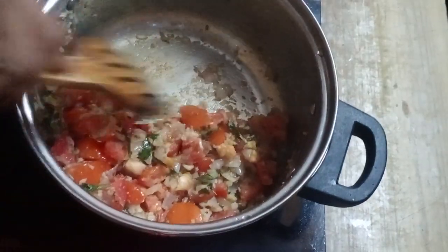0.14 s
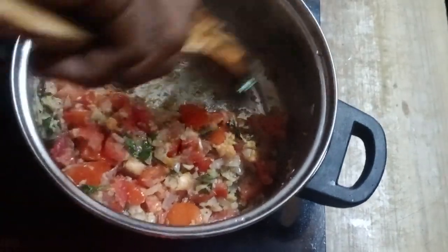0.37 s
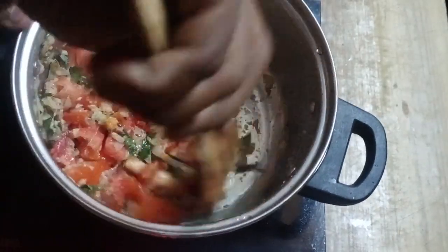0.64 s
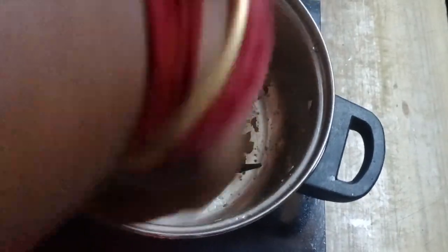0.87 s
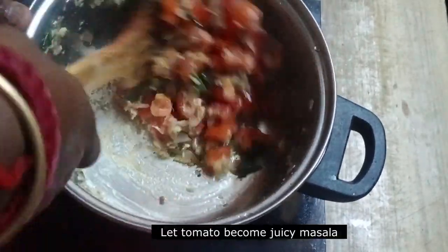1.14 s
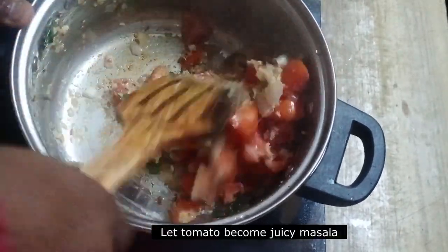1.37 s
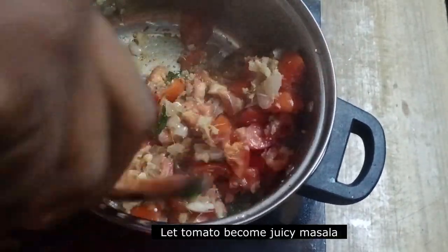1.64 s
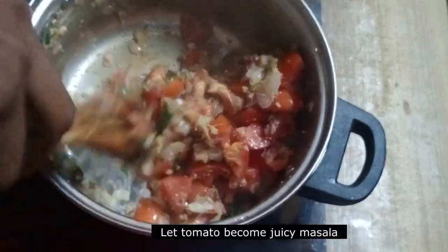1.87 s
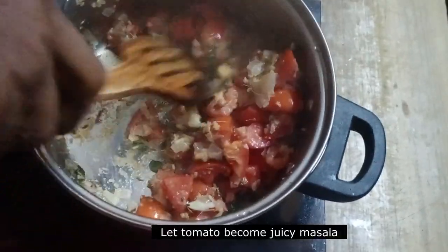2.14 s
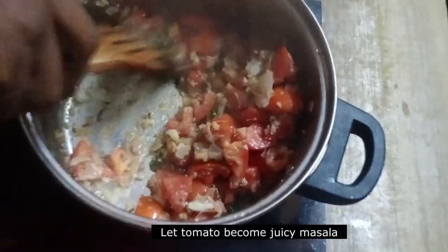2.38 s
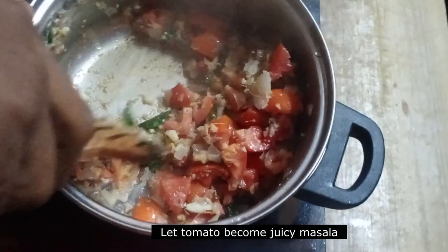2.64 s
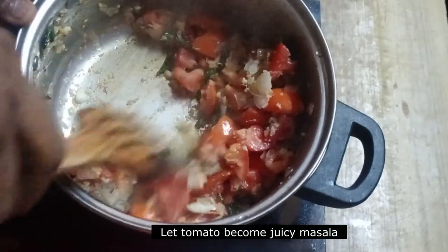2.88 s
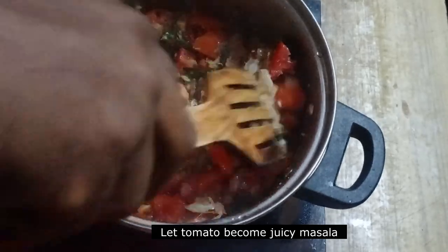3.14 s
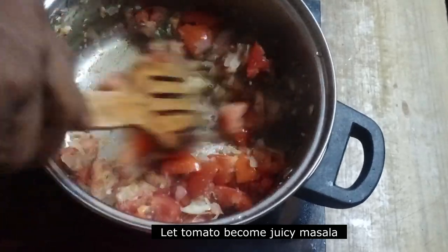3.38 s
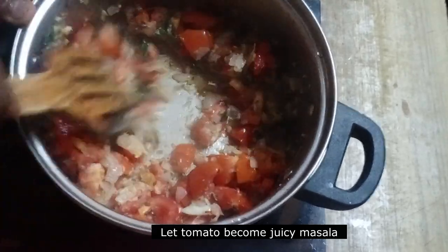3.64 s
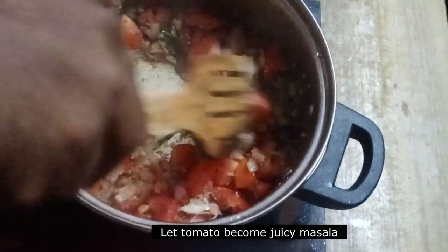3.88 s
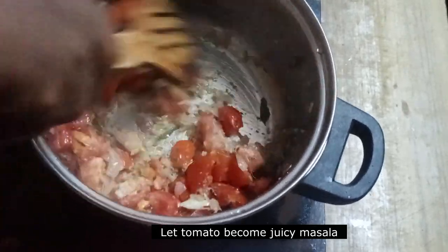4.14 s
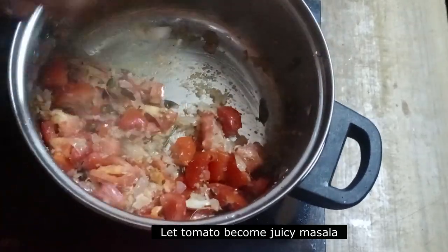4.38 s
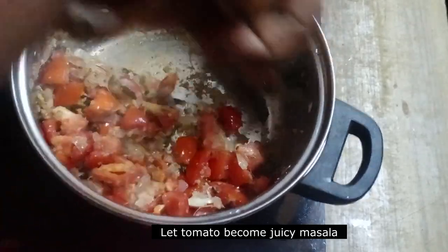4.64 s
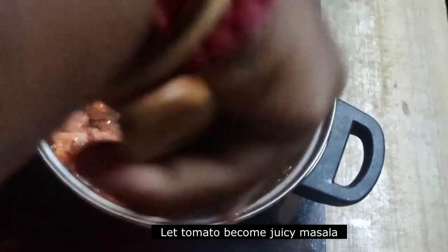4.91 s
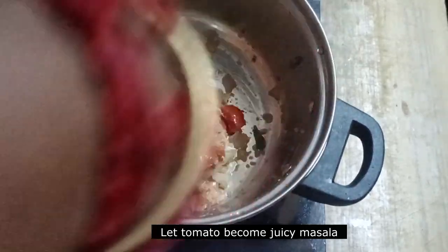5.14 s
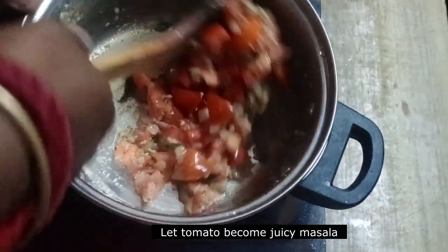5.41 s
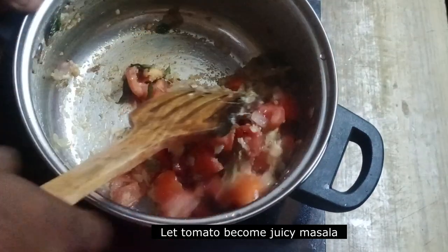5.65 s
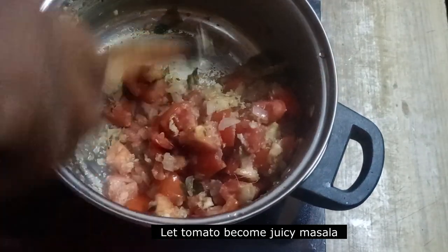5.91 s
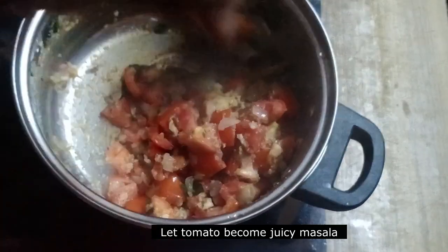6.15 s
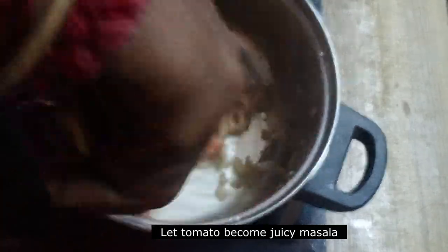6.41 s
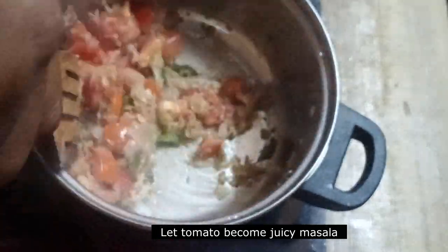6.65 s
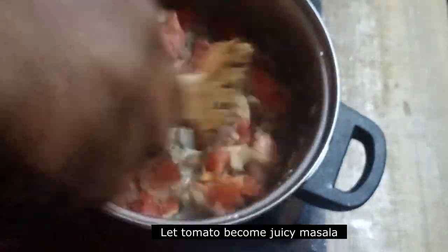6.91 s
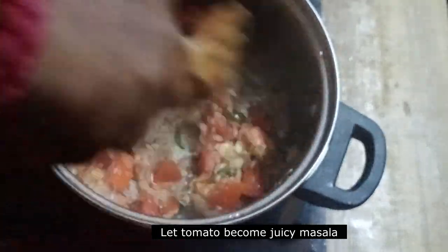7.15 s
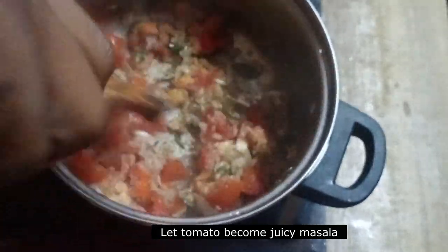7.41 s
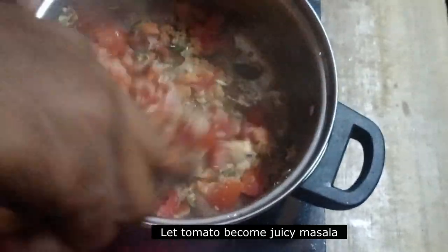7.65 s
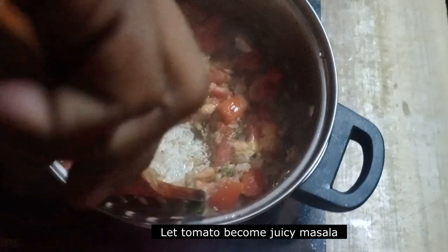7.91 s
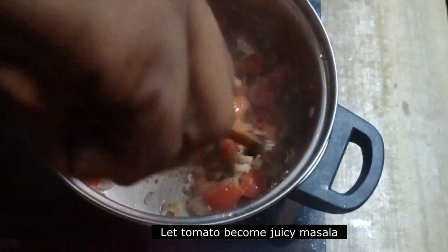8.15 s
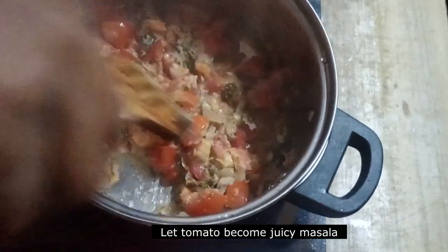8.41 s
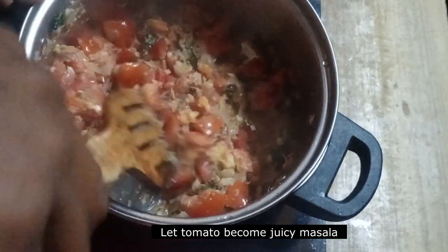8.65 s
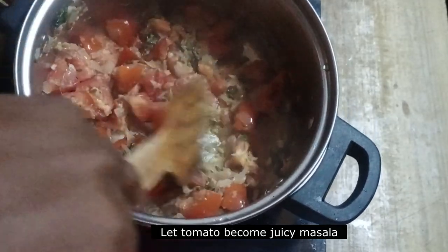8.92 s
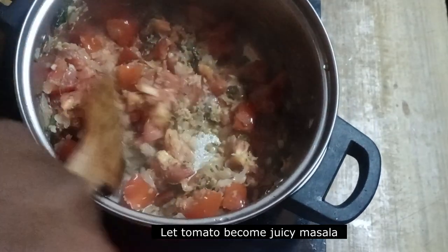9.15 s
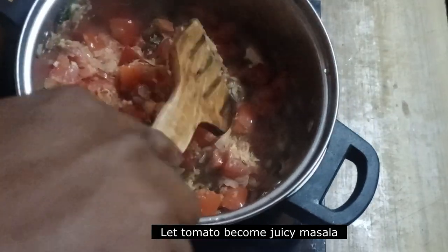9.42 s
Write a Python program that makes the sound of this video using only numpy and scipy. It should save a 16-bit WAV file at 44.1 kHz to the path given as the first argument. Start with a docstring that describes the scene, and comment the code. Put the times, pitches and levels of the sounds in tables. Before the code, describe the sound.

Close, bright frying hiss with dense crackle and sharp spits, flaring as wet vegetables are stirred, with woody scrapes and dull pot knocks.

```python
"""From the start, chopped tomato and onion sizzle in oil in a steel pot, close under a mono phone microphone:
dense clicks over a coloured hiss, with rare sharp spits. A wooden spatula strokes the pot, with a rumble
and hum through the stove and a scrape; its knocks make the pot ring dully. The oil flares up as wet food
meets bare hot steel, and now and then the sound thins to a few tones. Between 6.6 and 7.4 s the spatula
judders too, its slips thumping the stove grate and the pot."""
import sys
import numpy as np
from scipy import signal
from scipy.fft import rfft, irfft
from scipy.io import wavfile
from scipy.ndimage import uniform_filter1d

SR = 44100
rng = np.random.default_rng(int(sys.argv[2]) if len(sys.argv) > 2 else 0)


def master_out(mix):
    """Clip the mix to full scale and print it as 16-bit PCM to the path in sys.argv[1]."""
    frames = np.transpose(np.atleast_2d(mix))
    ceiling = np.clip(frames, -1, 1)
    pcm = np.round(ceiling * 32767).astype(np.int16)
    wavfile.write(sys.argv[1], SR, pcm)


def invert_db(level):
    """Linear amplitude ratio for a level in decibels (20 dB per decade), elementwise."""
    return 10 ** (np.asarray(level, dtype=float) / 20)


N = 420713

# How hard the oil fries. Each row: time in seconds, hiss level in dB, low fizz near 1.5 kHz in dB
# (for the fizz, only the changes against the hiss count).
FRYING = [(0.0, -25.5, -40.5), (0.58, -31, -48), (0.77, -27, -41.5), (0.9, -24, -42.5), (1.01, -23.5, -38),
          (1.33, -24, -45), (1.97, -24, -43), (2.23, -23.5, -39.5), (2.66, -23.5, -43.5),
          (3.27, -26.5, -45.5), (3.56, -22.5, -36), (3.93, -24, -39), (4.33, -24.5, -38),
          (4.49, -26, -43.5), (4.81, -25.5, -46), (5.26, -22, -35.5), (5.5, -22.5, -42), (6.24, -26, -47.5),
          (6.69, -22, -33.5), (6.91, -20.5, -34), (7.52, -22, -37), (8.03, -22, -40.5), (8.15, -22, -38.5),
          (9.54, -26, -45.5)]
# Colour of the sizzle. Each row: frequency in Hz, relative strength in dB per Hz.
SIZZLE_COLOUR = [(530, -32), (950, -28.5), (1080, -35), (1150, -15.5), (1290, -9.5), (1660, -12.5),
                 (2150, -12.5), (2700, -4.5), (3690, -0.5), (5090, -2), (6460, 1), (7200, -4.5),
                 (9360, -20.5), (11300, -17.5), (14700, -1), (15600, -6.5)]
# Finest spatter above the hiss. Each row: time in seconds, lift of the top treble in dB.
TOP_FIZZ = [(0, -1.5), (.9, 0.5), (1.8, -2), (3.0, 0), (3.6, 0.5), (4.6, 0), (5.6, -1.5), (7.0, -2.5),
            (7.8, -1.5), (9.54, -4)]
# Wet food meets hot steel and the sizzle flares. Each row: start in seconds, lift in dB before it fades.
FLARES = [(.3, 1.5), (.76, 1.5), (1.36, 1.5), (1.98, 1.5), (2.18, 2.5), (2.86, 2), (3.33, 6), (3.7, 3.5),
          (4.12, 5.5), (4.41, 3), (5.25, 1.5), (6.35, 5), (6.46, 1.5), (6.79, 1.5), (7.24, 3.5),
          (7.61, 2.5), (8.6, 1), (8.91, 2), (9.19, 3)]
FLARE_RISE_S, FLARE_FALL_S = 0.019, 0.12
FLARE_LOW = 1.1  # the low fizz swings this many times as far
SPITS_PER_S, SPIT_DB = 14, -19  # rare large drops of water bursting in the oil; typical size

# Colour of the stove's rumble. Each row: frequency as a multiple of the centre, strength in dB per Hz.
RUMBLE_COLOUR = [(.15, -60), (.4, -8.5), (.7, -16.5), (1.0, 2), (1.35, -9.5), (2.2, -23.5), (4, -65)]
# Ringing modes of the pot with food in it. Each row: frequency in Hz, relative level in dB,
# time to fall 60 dB in seconds.
POT_MODES = [(150, -32, 0.11), (205, -18, 0.24), (283.6, -5, 0.078), (361, 0.5, 0.032), (420, -5, 0.1),
             (438.2, -5, 0.13), (485, -5.5, 0.051), (560, -11, 0.14), (600, -4.5, 0.02), (697, -14.5, 0.14),
             (765.6, -10.5, 0.16), (834, -8.5, 0.094), (951, -10, 0.072), (1040, -4, 0.036),
             (1180, -15, 0.15), (1299, -2, 0.064), (1450, -14, 0.2), (1544, 3.5, 0.009),
             (1930, -7.5, 0.037), (2496, -2.5, 0.032), (2918, 5.5, 0.033), (3620, -1, 0.036),
             (5460, 9, 0.07), (7430, -15, 0.057)]
# Strokes of the spatula. Each row: start in seconds, length in seconds, mid-stroke rumble through the
# stove in dB, its mid-stroke centre in Hz, scrape of wood on steel in dB.
STROKES = [(0.013, 0.11, -51, 192, -70), (0.303, 0.21, -58.5, 151, -52), (0.535, 0.14, -55, 70, -49),
           (0.877, .16, -45, 195.8, -43), (1.047, 0.13, -55, 75, -53), (1.25, 0.11, -51, 97, -62),
           (1.645, .15, -46.5, 103.3, -65), (1.815, 0.11, -55, 153, -44), (2.043, 0.34, -47, 105.2, -57),
           (2.363, 0.18, -41, 114.8, -41), (2.578, 0.11, -57, 195, -47), (2.8, 0.32, -50, 107.4, -55),
           (3.13, 0.19, -46, 103.2, -65), (3.375, 0.094, -48, 122, -54), (3.554, 0.24, -48.5, 101.7, -80),
           (3.89, 0.14, -48, 106, -60), (4.0, 0.21, -45.5, 144.7, -47), (4.27, 0.13, -47, 190, -50),
           (4.639, 0.21, -48, 105, -56), (4.75, 0.274, -54.5, 188.3, -64), (4.9, 0.085, -57, 95, -60),
           (5.172, .16, -51, 95.7, -66), (5.391, 0.1, -45, 106, -50), (5.547, 0.23, -55, 105, -57),
           (5.553, .6, -58, 66.5, -56), (5.99, .11, -43, 196, -58), (6.127, 0.4, -44.5, 102, -52),
           (6.7, 0.37, -48, 99.4, -50), (7.08, 0.4, -46, 67.2, -54), (7.45, 0.264, -37, 116, -56),
           (7.64, 0.13, -41.5, 194.4, -55), (7.824, 0.29, -41.5, 100.1, -55),
           (8.094, 0.52, -45, 113.9, -63), (8.637, 0.11, -51, 101, -63), (9.133, 0.39, -49.5, 94.5, -63),
           (9.25, 0.11, -37.5, 199, -47)]
STROKE_EDGE_S = 0.045  # soft start and end
STROKE_RISE = 0.067  # the rumble climbs by this share as the blade speeds up
STROKE_SWELL_DB = 2  # growth in level from start to end
REST_RUMBLE_DB, REST_HZ, REST_SCRAPE_DB = -71.5, 80, -59  # always there, also between strokes
HUM_DB, HUM_WAVER = -0.5, 0.028  # offset from the rumble level in dB, pitch waver as a share (rms)

# Spatula blows. Each row: start in seconds, peak level in dB, frequency favoured by the spot struck in Hz,
# how much it is favoured in dB, hardness as a lift of the higher modes in dB (scaled inside knock).
KNOCKS = [(0.041, -21, 374, 17, 2), (0.338, -8, 487, 14.5, 3), (0.388, -23.5, 450, 17, 3),
          (0.421, -18, 1920, 16, 6), (0.879, -31, 479, 22, 0), (1.712, -31, 420, 15, 3.5),
          (1.823, -20, 710, 20, -6), (1.982, -32, 305, 12, -2), (2.386, -10, 990, 3.5, 2),
          (2.579, -18.5, 1440, 7, -4.5), (3.649, -22.5, 640, 39, 5), (3.745, -28, 1390, -3, 1),
          (3.994, -22, 402, 24, 1), (4.089, -20, 425, 11, 5.5), (4.274, -11.5, 560, 5, -2),
          (4.299, -17.5, 1180, 10, -0.5), (4.424, -13, 1280, 10, 7.5), (4.451, -18, 459, 7.5, 4.5),
          (4.687, -13, 1040, 11.5, -4.5), (4.742, -20.5, 414, 1, 1.5), (5.418, -37, 342, 20, -5),
          (6.007, -12.5, 1450, 14.5, 7.5), (6.212, -14.5, 1040, 19, -6), (6.262, -19, 427, 3, -1.5),
          (6.386, -28, 483, 3, -3), (6.64, -23, 425, 5, -6), (6.698, -31, 436, 16, -2),
          (6.791, -17, 627, 24, 3), (6.846, -25, 1280, -9, 2), (7.049, -14.5, 420, 12, 6.5),
          (7.139, -29.5, 287, 18, -7), (7.627, -24.5, 1232, 10, 4.5), (7.698, -26.5, 445, 2, 0),
          (7.913, -17.5, 1930, 24, 6), (7.954, -14.5, 1290, 8, 3.5), (8.019, -14, 1180, 10, 3.5),
          (8.088, -13, 1030, 13, 1), (8.338, -34, 414, 18, -2), (8.649, -21.5, 410, 14, 9.5),
          (8.905, -24, 420, 16, 8.5), (9.174, -19, 425, 19, 10), (9.217, -18.5, 408, 9, 7.5),
          (9.27, -23, 428, 19, 1), (9.307, -33, 410, 27, 8), (9.359, -39, 420, 21, -1)]
CHATTER_DB, CHATTER_SLOPE = -32.5, -0.52  # light blows chatter more for their size: dB per dB of peak
# Moments when the whole sound thins to a few tones. Each entry: middle in seconds.
THIN = [.667, .690, .737, .760, .853, 1.341, 1.387, 1.944, 2.501, 2.524, 5.171, 5.218, 5.288, 5.357, 6.333,
        6.658, 6.681, 7.076, 7.424, 7.470, 7.795, 7.819]
# The spatula judders along the bottom. Each row: time in seconds, slips a second, level in dB.
JUDDER = [(6.62, 35, -48), (6.72, 35, -45.5), (7.0, 35, -41), (7.32, 35.5, -42), (7.42, 32, -67)]
EDGE_HZ = 15760  # upper limit of the band


def evened(x):
    """Scales a signal so its average size (rms) is 1."""
    return x / np.sqrt(np.mean(x ** 2) + 1e-20)


def read(points, hz):
    """Reads a spectrum on a log-frequency axis, as pitch is heard."""
    f, value = np.transpose(points)
    return np.interp(np.log(hz + 1), np.log(f + 1), value)


def curves(rows, t):
    """Reads every column of a table of changes at times t."""
    s, *columns = np.transpose(rows)
    return [np.interp(t, s, c) for c in columns]


def add(mix, s, sound):
    """Mixes a sound in, starting at s seconds."""
    part = mix[round(s * SR):][:len(sound)]
    part += sound[:len(part)]


def spectrum(x, size):
    """Splits a sound into frequencies and overlapping moments."""
    return signal.stft(x, SR, nperseg=size, noverlap=size * 3 // 4)


def sound_from(z, size):
    """Turns such a spectrum back into sound."""
    return signal.istft(z, SR, nperseg=size, noverlap=size * 3 // 4)[1][:N]


def patches(shape, bins, frames):
    """Random blotches over frequency and time, with rms 1."""
    z = rng.standard_normal(shape[::-1]).T
    z = uniform_filter1d(z, bins, 0)
    return evened(uniform_filter1d(z, frames, 1))


def frying(t):
    """Level of the hiss and of the low fizz at times t: a slow curve plus every flare."""
    s, lift_db = np.transpose(FLARES)[:, :, None]
    since = np.maximum(t - s, 0)
    rise = np.minimum(since / FLARE_RISE_S, 1)
    flare_db = (lift_db * rise * np.exp(-since / FLARE_FALL_S)).sum(0)
    level_db, low_db = curves(FRYING, t)
    return level_db + flare_db, low_db + FLARE_LOW * flare_db


def sizzle(pops_per_s=5000, size_db=0.5, hiss=0.73, patchy_db=1.31, blotchy_db=5.0):
    """Steam bubbles burst in the oil: dense uneven clicks over a hiss, coloured by pot and microphone."""
    size = invert_db(size_db * np.minimum(rng.exponential(1, N), 6)) * rng.choice([-1., 1.], N)
    pops = size * (rng.random(N) < pops_per_s / SR)
    hz, t, z = spectrum(evened(pops) + hiss * rng.standard_normal(N), 1024)
    level_db, low_db = frying(t)
    # how far each frequency belongs to the low fizz or to the finest spatter, 0 to 1
    low = np.clip((3000 - hz) / 800, 0, 1)[:, None]
    top = np.clip((hz - 7500) / 1500, 0, 1)[:, None]
    low_db = low_db - level_db
    top_db = curves(TOP_FIZZ, t)[0] - 0.027 * (level_db - level_db.mean())
    shift_db = low * (low_db - low_db.mean()) + top * top_db
    # the low fizz breaks into short, faintly pitched blotches
    blotches_db = low * blotchy_db * patches(z.shape, 2, 8)
    patch_db = patchy_db * patches(z.shape, 16, 6)
    z = z * invert_db(read(SIZZLE_COLOUR, hz)[:, None] + shift_db + blotches_db + patch_db)
    return evened(sound_from(z, 1024)) * invert_db(np.interp(np.arange(N) / SR, t, level_db))


def spits(spread_db=3.0, centre_hz=5000, t60=0.0032):
    """Single sharp spits of oil, each a very short bright tick at a random moment."""
    t = np.arange(SR // 100) / SR
    tick = invert_db(-60 * t / t60) * np.sin(2 * np.pi * centre_hz * t)
    size = invert_db(SPIT_DB + spread_db * rng.standard_normal(N)) * rng.choice([-1., 1.], N)
    hits = size * (rng.random(N) < SPITS_PER_S / SR)
    return signal.oaconvolve(hits, tick)[:N]


def stroke_gates(t):
    """For each stroke: its gate from 0 to 1 with soft edges, and how far through the stroke it is."""
    s, length = np.transpose(STROKES)[:2, :, None]
    gate = np.clip(np.minimum(t - s, s + length - t) / STROKE_EDGE_S, 0, 1)
    return gate, np.clip((t - s) / length, 0, 1)


def rumble(lumpy_db=6.0):
    """Strokes shake the stove: lumpy low noise whose centre climbs during each stroke."""
    rumble_db, centre_hz = np.transpose(STROKES)[2:4, :, None]
    fine = np.arange(0, N + 64, 64) / SR
    gate, along = stroke_gates(fine)
    power = (gate * invert_db(rumble_db + STROKE_SWELL_DB * (along - .5))) ** 2
    rest = invert_db(REST_RUMBLE_DB) ** 2
    total = power.sum(0) + rest
    # louder strokes pull the shared centre harder
    climbing_hz = centre_hz * (1 + STROKE_RISE * (along - .5))
    centre = ((power * climbing_hz).sum(0) + rest * REST_HZ) / total
    hz, t, z = spectrum(rng.standard_normal(N), 2048)
    times, db = np.transpose(RUMBLE_COLOUR)
    ratio = hz[:, None] / np.interp(t, fine, centre)
    shape = invert_db(np.interp(np.log(ratio + 1e-3), np.log(times), db))
    z = z * shape / np.linalg.norm(shape, axis=0) * invert_db(lumpy_db * patches(z.shape, 2, 6))
    return np.interp(np.arange(N) / SR, fine, np.sqrt(total)) * evened(sound_from(z, 2048))


def rings(weight_db, rise=0.00029):
    """The pot's answer to one tap: its modes weighted, each starting up or down by chance."""
    hz, db, t60 = np.transpose(POT_MODES)[:, :, None]
    t = np.arange(SR // 4) / SR
    sign = rng.choice([-1., 1.], hz.shape)
    swell = 1 - np.exp(-t * hz / (430 * rise))  # low modes take longer to get going
    level = invert_db(db + weight_db(hz) - 60 * t / t60)
    return (sign * swell * level * np.sin(2 * np.pi * hz * t)).sum(0)


def scrape(grit_per_s=400, grit_db=1.0, shifting_db=7.0):
    """Grit under the wooden blade gives many tiny taps that keep the pot faintly ringing."""
    def weight_db(hz):
        return -1.5 * np.log2(hz / 400) - 15 * (hz < 250) - 12 * (hz > 1100)

    fine = np.arange(0, N + 64, 64) / SR
    gate, _ = stroke_gates(fine)
    scrape_db = np.transpose(STROKES)[4, :, None]
    power = ((gate * invert_db(scrape_db)) ** 2).sum(0) + invert_db(REST_SCRAPE_DB) ** 2
    size = invert_db(grit_db * rng.exponential(1, N)) * rng.standard_normal(N)
    grit = size * (rng.random(N) < grit_per_s / SR)
    z = spectrum(signal.oaconvolve(grit, rings(weight_db))[:N], 2048)[2]
    # the scrape is blotchy, its tone colour shifting from moment to moment
    z = z * invert_db(shifting_db * patches(z.shape, 5, 7))
    return np.interp(np.arange(N) / SR, fine, np.sqrt(power)) * evened(sound_from(z, 2048))


def hum():
    """The stove top hums under each stroke, a wavering tone that climbs with the rumble."""
    out = np.zeros(N)
    for s, length, db, hz, _ in STROKES:
        t = np.arange(0, length, 1 / SR)
        waver = evened(uniform_filter1d(rng.standard_normal(len(t)), 1500))
        pitch = hz * (1 + STROKE_RISE * (t / length - .5) + HUM_WAVER * waver)
        gate = np.clip(np.minimum(t, length - t) / STROKE_EDGE_S, 0, 1)
        level = invert_db(db + HUM_DB + STROKE_SWELL_DB * (t / length - 1.0))
        add(out, s, level * gate * np.sin(2 * np.pi * np.cumsum(pitch) / SR))
    return out


def knock(s, peak_db, spot_hz, spot_db, edge_db, t60=0.2, contact_s=0.0068):
    """The blade lands, slaps flat over a few milliseconds, then chatters on; all of it rings the pot."""
    def weight_db(hz):
        spot = spot_db * np.exp(-(np.log2(hz / spot_hz) / 0.12) ** 2)
        hard = edge_db * np.clip(np.log2(hz / 500), 0, 1) + (2.3 * edge_db - 9.0) * (hz > 2200)
        return spot + hard

    t = np.arange(SR // 8) / SR
    fade = signal.windows.tukey(2 * len(t), .4)[len(t):] * (1 - np.exp(-t / 0.0038))
    slap = 0.13 * invert_db(-.8 * edge_db) * np.sin(np.pi * np.clip(t / contact_s, 0, 1))
    chatter = invert_db(CHATTER_DB + CHATTER_SLOPE * peak_db - 60 * t / t60) * fade
    force = (slap + chatter) * rng.standard_normal(len(t))
    force = 3 * uniform_filter1d(force, size=9)  # wood sliding on steel is duller than its first contact
    force[0] += 0.63 * invert_db(.4 * edge_db)  # a hard edge lands at once, a flat blade spreads the blow
    sound = signal.fftconvolve(force, rings(weight_db))
    return s, invert_db(peak_db) * sound / np.abs(sound).max()


def thinned(x, keep_db=2.26, boost_db=2.5, local=0.54):
    """At each thin moment only the strongest lines of a 46 ms spectrum survive, slightly boosted."""
    out, size = x.copy(), 2048
    window = np.sin(np.pi * (np.arange(size) + .5) / size)
    for s in THIN:
        at = round(s * SR) - size // 2
        z = rfft(window * x[:, at:at + size])
        power = abs(z) ** 2
        # the bar to clear lies between the overall mean and the mean of nearby lines
        bar = power.mean() ** (1 - local) * uniform_filter1d(power, 31, 1) ** local
        strong = power > invert_db(2 * keep_db) * bar
        change = z * (strong * invert_db(boost_db) - 1)
        out[:, at:at + size] += window * irfft(change)
    return out


def judder(grate_hz=176, t60=0.093):
    """The blade sticks and slips; its nearly steady pulses thump the stove grate and the lower pot modes."""
    t = np.arange(JUDDER[0][0], JUDDER[-1][0], 1 / SR)
    per_s, db = curves(JUDDER, t)
    uneven = 1 + 0.18 * uniform_filter1d(rng.standard_normal(len(t)), 2000)
    turns = np.cumsum(per_s * uneven) / SR
    slips = np.diff(np.floor(turns), prepend=0)  # one pulse at each whole turn
    u = np.arange(SR // 4) / SR
    grate = invert_db(-60 * u / t60) * np.sin(2 * np.pi * grate_hz * u)
    thump = grate + rings(lambda hz: -6 - 9 * abs(np.log2(hz / 260)))
    return t[0], invert_db(db) * evened(signal.fftconvolve(slips, thump)[:len(t)])


def scene():
    """All sources added together, the same on both channels."""
    mix = sizzle() + spits() + rumble() + scrape() + hum()
    for row in KNOCKS:
        add(mix, *knock(*row))
    add(mix, *judder())
    return np.array([mix, mix])


def top_cut(x):
    """Nothing passes above the cut-off."""
    return signal.sosfilt(signal.butter(12, 17100, fs=SR, output="sos"), x)


def record(dry):
    """The small microphone loses deep bass, the treble stops at the band limit, and moments thin out."""
    bass_cut = signal.butter(3, 62, "high", fs=SR, output="sos")
    heard = signal.sosfilt(bass_cut, dry)
    band_limit = signal.firwin(511, EDGE_HZ, window=("kaiser", 9), fs=SR)
    heard = signal.oaconvolve(heard, band_limit[None], "same")
    mix = thinned(heard)
    return top_cut(mix)


dry = scene()
out = record(dry)
master_out(out)
```